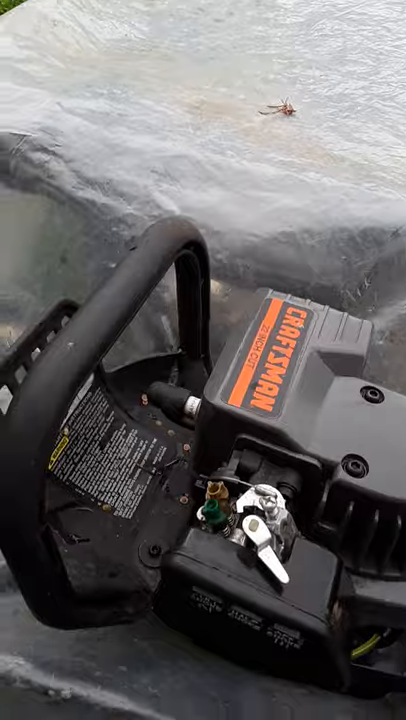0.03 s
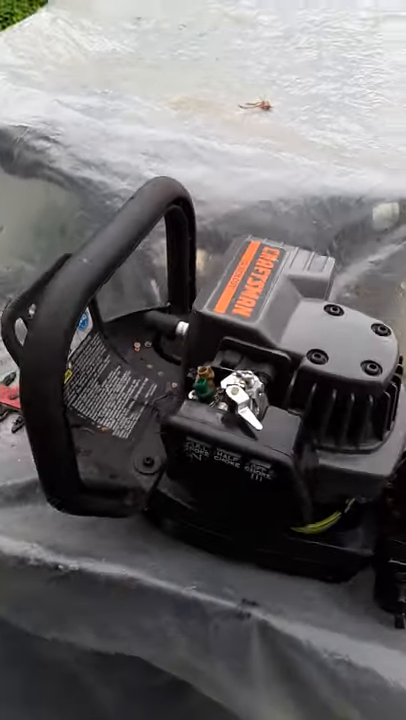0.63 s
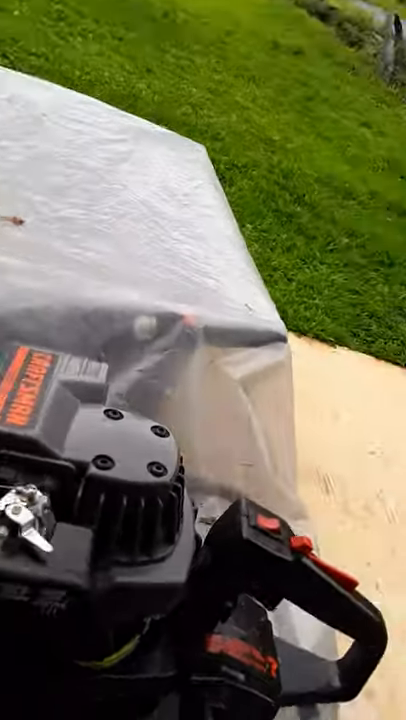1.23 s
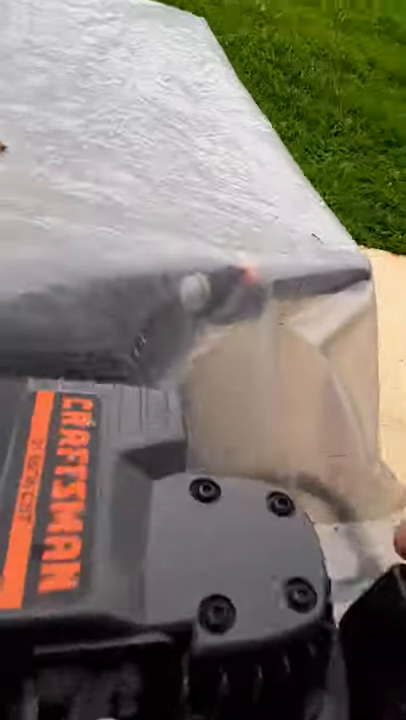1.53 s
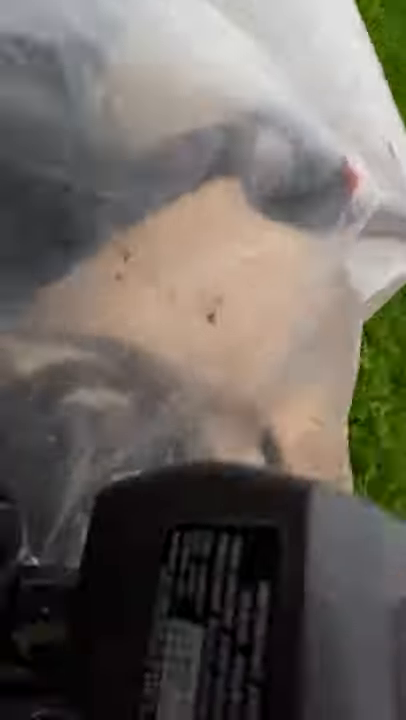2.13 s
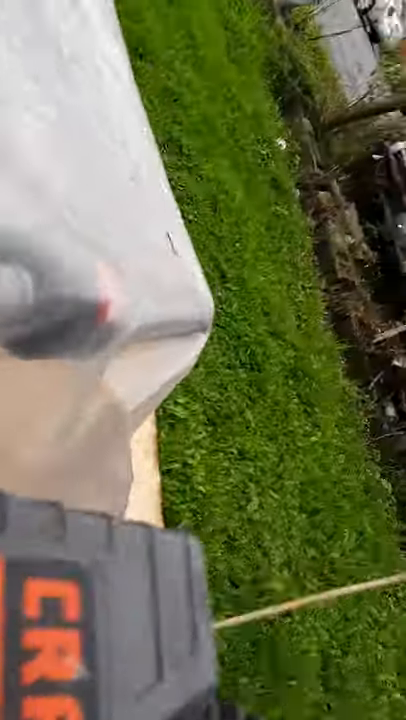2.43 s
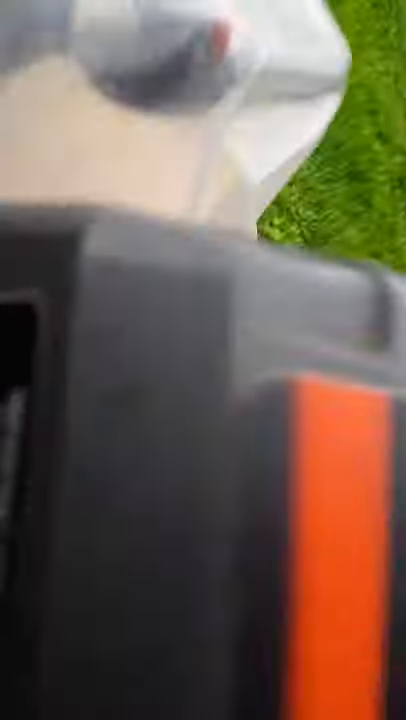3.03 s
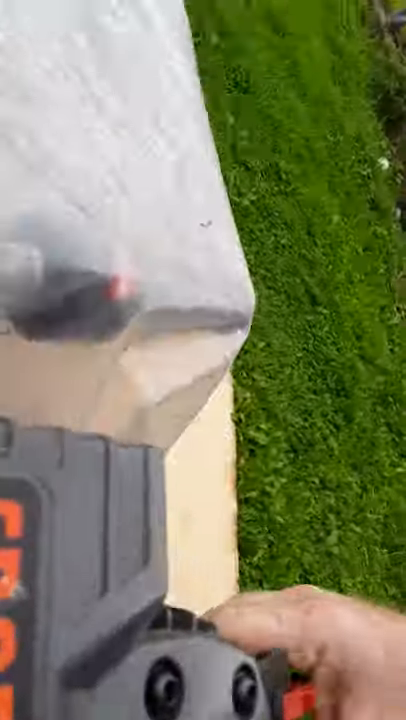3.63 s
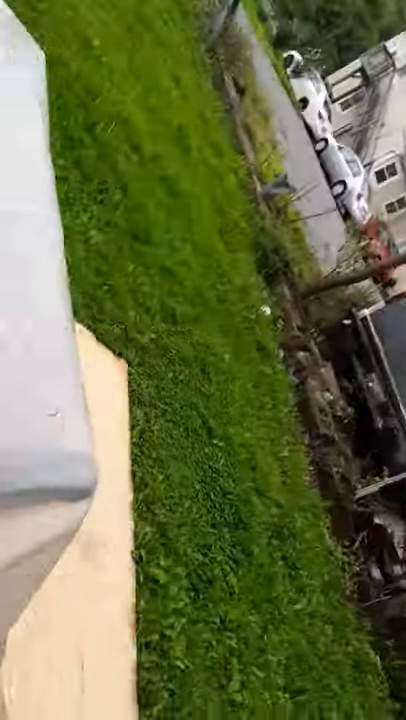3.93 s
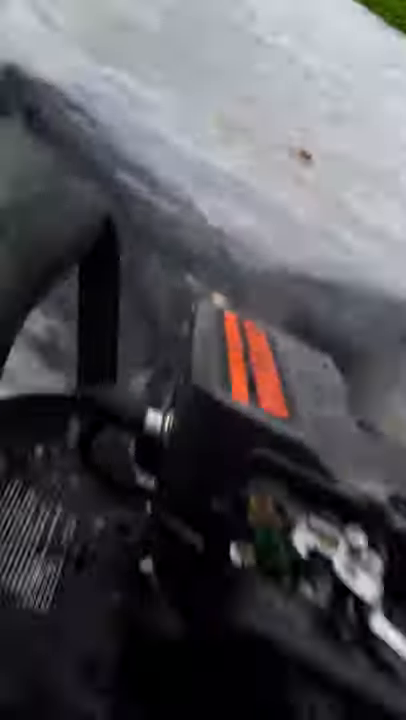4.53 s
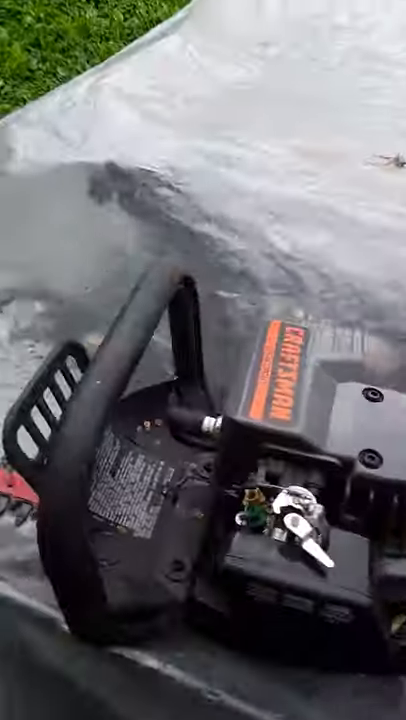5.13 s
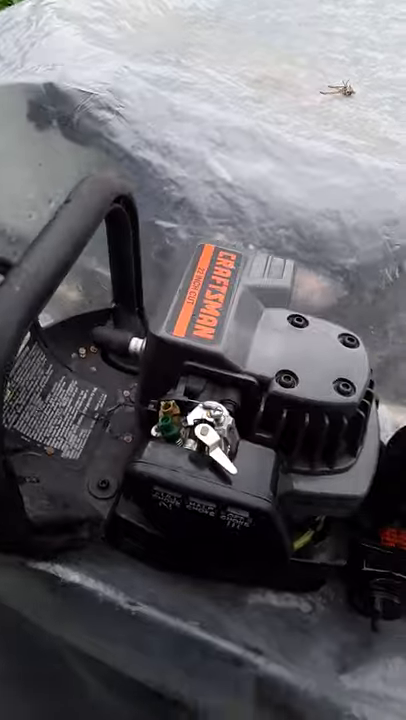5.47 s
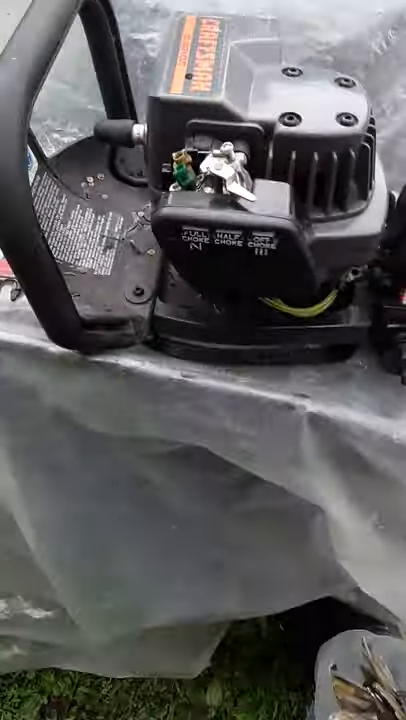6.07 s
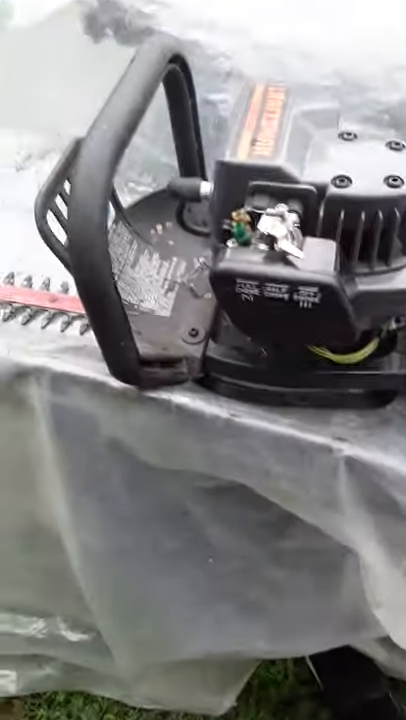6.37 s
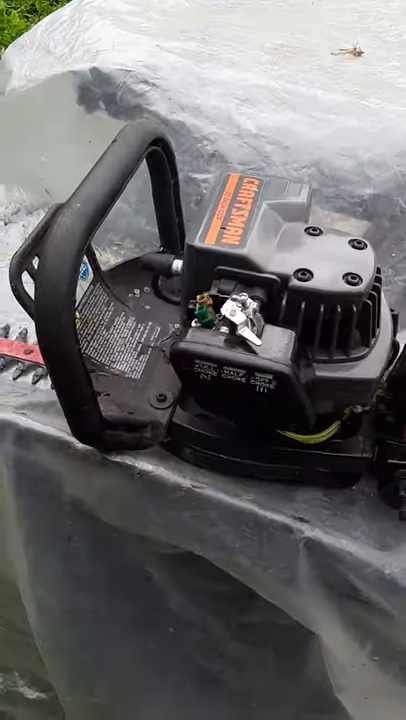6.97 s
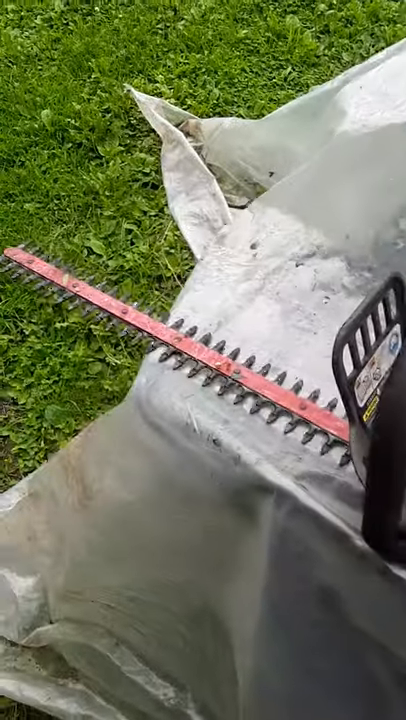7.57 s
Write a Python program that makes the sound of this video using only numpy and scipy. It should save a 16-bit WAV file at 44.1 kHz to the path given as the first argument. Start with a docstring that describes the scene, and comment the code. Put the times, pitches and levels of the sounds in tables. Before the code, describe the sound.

Close up on a quiet lawn with faint insects, a hand knocks against a gasoline hedge trimmer's plastic housing. The first cord pull only chugs and clicks back; the second squeaks and the engine catches. It putters unevenly, dips in level as the microphone turns away, then returns as a buzzing idle with clinking loose metal. One short rev sets the blades rasping before it drops back to idle.

```python
"""A two-stroke hedge trimmer is pull-started on a garden table, climbs to a rattling idle and revs once.
The cord cranks the piston, the starter pawls chatter on the rewind, and a second tug fires the engine.
Each turn puffs through the muffler, slaps the case and shakes loose metal; the rev runs the blades.
The microphone moves from the engine's rear to its front. Behind: insects, open air and a far motor."""
import sys
import numpy as np
from scipy import signal
from scipy.fft import rfft, irfft, next_fast_len
from scipy.io import wavfile
from scipy.ndimage import map_coordinates

SR = 44100
rng = np.random.default_rng(int(sys.argv[2]) if len(sys.argv) > 2 else 0)


def put_to_file(sound):
    """Save the sound as 16-bit audio at rate SR, in the file named by the first command-line argument."""
    columns = np.atleast_2d(sound).T  # one column per channel
    safe = np.clip(columns, -1, 1)
    whole_steps = np.round(safe * 32767)
    wavfile.write(sys.argv[1], SR, whole_steps.astype(np.int16))


N = 343980
TIME = np.arange(N) / SR

# Crank speed. Each row: time in seconds, turns per second.
CRANK_HZ = [(2.84, 20.6), (2.9, 35.8), (3.08, 43.7), (3.34, 53.0), (3.53, 56.0), (3.71, 59.1), (4.01, 61.7),
            (4.12, 65.2), (4.35, 64.0), (4.77, 69.3), (5.26, 66.3), (5.58, 68.0), (6.16, 64.9),
            (6.28, 72.3), (6.41, 64.3), (6.52, 80.4), (6.72, 96.9), (6.91, 83.8), (7.08, 78.6),
            (7.35, 66.7), (7.8, 60.7)]
# Exhaust tones when every turn fires. Each row: multiple of crank speed, level in dB.
EXHAUST_ORDERS = [(1, -49), (3, -25), (4, -31), (5, -29), (7, -29), (8, -31)]

# Spectra. Each row: frequency in Hz, relative density in dB.
MUFFLER_SPECTRUM = [(30, -24), (80, -23), (132, -20), (170, 0), (265, 5.5), (350, 3), (450, -1),
                    (550, -0.5), (750, -12), (1100, -20), (2500, -39)]
GAS_RUSH_SPECTRUM = [(70, -23), (130, -15.5), (220, -1.5), (330, 3), (430, -2), (580, -7), (800, -22),
                     (1200, -22), (3000, -69)]
CASE_REAR_SPECTRUM = [(350, 3.5), (600, -2.5), (953, -8.5), (1270, -4.5), (1400, -10), (1600, -3.5),
                      (1790, -3), (2400, -15), (2760, -19), (3200, -22.5), (4160, -23), (7040, -120)]
CASE_FRONT_SPECTRUM = [(350, -8.5), (600, 2), (920, -3.5), (993, 0), (1190, -3.5), (1290, 3.5),
                       (1440, -5.5), (1570, 3.5), (1740, -6), (1930, 3.5), (2300, -18.5), (2800, -23),
                       (3200, -29.5), (4160, -40), (7040, -120)]
HISS_SPECTRUM = [(1290, -49), (2200, 11.5), (2310, 5.5), (3770, -1.5), (4680, 2.5), (5350, 4), (7900, -5.5),
                 (8870, -17.5), (10100, -12), (11600, -4), (12100, -11), (12600, -5), (13700, -9),
                 (16000, -16)]
BLADE_SPECTRUM = [(590, -18), (1000, 0), (1150, -12), (1480, 5), (1690, -9.5), (1980, 5.5), (2310, -11),
                  (4310, -12), (5310, -26), (6250, -23), (7700, -18), (8260, -29.5), (12400, -12),
                  (16000, -20)]
REEL_SPECTRUM = [(120, -5), (200, -4), (334, -1.5), (387, -8), (601, 1.5), (986, -4.5), (1420, -6),
                 (1650, -0.5), (1870, -9), (3830, -16.5), (4520, -20), (5940, -10.5), (6760, -13.5),
                 (8740, -38), (16000, -32)]
PAWL_SPECTRUM = [(120, -68), (200, -12), (1400, -2), (2050, -1.5), (3370, -5.5), (3760, -5), (4200, -26),
                 (6760, 3.5), (7970, -12), (9580, -21.5), (11500, -15), (16000, -17.5)]
SNAP_SPECTRUM = [(1500, -1.5), (2600, 11), (3200, 7.5), (3900, 6), (6500, 5.5), (8000, -8.5),
                 (15000, -10.5)]
INSECT_SPECTRUM = [(4000, -47), (5900, -16.5), (6400, -7), (6650, -3), (7000, -13), (7600, -25),
                   (9000, -47), (16000, -44)]
AIR_SPECTRUM = [(25, -34), (55, -10), (95, -1.5), (160, -2), (250, -10), (500, -13), (1000, -11.5),
                (1900, -15), (2700, -25.5), (5000, -25.5), (8000, -41)]
RUSTLE_SPECTRUM = [(180, -25), (300, -11), (565, 0.5), (870, -8.5), (1320, 3.5), (2320, -16), (4020, -4.5),
                   (5080, -17), (6620, -13), (7950, -34), (13100, -21), (16000, -42)]

# Resonances. Each row: frequency in Hz, bandwidth in Hz, relative level in dB.
MUFFLER_BARK_MODES = [(595, 80, 4), (745, 100, 2.5), (890, 130, -4)]
MUFFLER_SHELL_MODES = [(535, 90, 0), (720, 200, -12)]
AIRBOX_MODES = [(370, 160, -10.5), (452, 46, 7), (588, 143, 7.5), (707, 86, -4)]
LOOSE_METAL_MODES = [(4360, 86, -2.5), (8690, 44, 4), (11700, 810, -2.5), (12320, 95, 14),
                     (12830, 160, 6.5), (13600, 1200, -8.5)]
TOOTH_MODES = [(3440, 100, 1), (4320, 220, -5), (6060, 300, 11.5), (6460, 600, 6.5)]
CRANKCASE_MODES = [(590, 70, 0), (746, 90, -4), (1720, 120, -3)]
HUB_MODES = [(750, 400, -15), (2120, 210, -8), (3785, 55, -4), (5095, 75, -5), (5900, 60, -13),
             (6640, 80, 2.5), (6998, 25, -2), (7500, 47, -18), (9785, 80, -15)]
HOUSING_MODES = [(1143, 205, 8.5), (1324, 156, 9), (1730, 165, 9.5), (1850, 240, 4)]
THUD_MODES = [(481, 34, 5), (706, 86, 4)]

# Spells of harder rattling. Each row: centre in seconds, length in seconds, boost in dB.
RATTLE_SPELLS = [(4.175, 0.12, 11), (4.77, 0.28, 12), (5.566, 0.46, 8), (6.353, 0.061, 5),
                 (6.527, 0.31, 11.5), (7.2, 0.52, 4)]
# Passing resonances of the running engine.
# Each row: centre in seconds, length in seconds, frequency in Hz, bandwidth in Hz, level in dB.
PASSING_RESONANCES = [(3.066, 0.017, 6550, 550, -22.5), (4.9, 0.029, 1800, 220, -30),
                      (3.22, 0.036, 6300, 370, -25.5), (3.26, 0.033, 6360, 500, -24.5),
                      (3.2, 0.51, 4500, 1100, -40.5), (3.54, 1, 6100, 1100, -39.5),
                      (5.77, 0.58, 535, 60, -30), (6.08, 0.3, 475, 40, -27), (4.78, 0.3, 8700, 100, -40),
                      (5.877, 0.3, 8660, 80, -38), (4.77, 0.13, 4700, 490, -31),
                      (5.02, 0.65, 1354, 140, -30), (4.967, 0.25, 1530, 43, -31.5),
                      (4.96, 0.19, 2590, 110, -36), (5.14, 0.18, 2680, 220, -34.5),
                      (4.8, 0.3, 12500, 300, -45), (5.53, 0.12, 12390, 77, -24),
                      (6.3, 0.23, 12450, 90, -32), (6.31, 0.17, 12800, 870, -33),
                      (6.55, 0.18, 12700, 150, -35), (6.75, 0.9, 1380, 490, -26),
                      (7.248, 0.36, 12100, 500, -40), (7.2, 0.56, 2000, 70, -27),
                      (7.5, 0.52, 1557, 96, -24.5), (7.5, 0.45, 1040, 120, -35.5),
                      (7.4, 0.26, 4400, 160, -42), (7.42, 0.22, 8850, 55, -49)]
# Hardest shakes of the loose metal. Each row: start in seconds, level in dB.
SHAKES = [(3.015, -30), (3.039, -26), (3.132, -38), (3.173, -29), (3.777, -36), (4.149, -27), (5.075, -25),
          (5.122, -23), (5.169, -28), (5.284, -27), (5.33, -25.5), (5.375, -30), (5.4756, -29),
          (5.514, -36), (5.5674, -26), (5.6128, -35), (5.691, -18.5), (5.776, -19.5), (6.624, -21),
          (7.356, -23), (7.415, -24)]
# Taps on a loose steel plate. Each row: start in seconds, level in dB.
PLATE_TAPS = [(4.79, -35), (4.895, -31), (4.935, -31), (5.01, -38), (5.195, -28), (5.45, -39), (5.73, -35),
              (5.87, -32), (6.38, -35), (7.5, -41)]

# Cord running off its reel. Each row: time in seconds, level in dB.
CORD_DB = [(2.01, -28), (2.104, -19.5), (2.33, -16.5), (2.386, -23.5), (2.4, -32), (2.46, -26)]
# Unfired strokes. Each row: port opening in seconds, level in dB, lead of the compression in seconds.
STROKES = [(2.135, -13.5, 0.023), (2.205, -10.5, 0.011), (2.2545, -7.5, 0.021), (2.303, -9, 0.02),
           (2.361, -12.5, 0.022), (2.453, -24, .022), (2.619, -25, 0.01), (2.639, -27, 0.02)]
# Braid on the cord guide. Each row: time in seconds, pitch in Hz, level in dB.
CORD_SQUEAK = [(1.97, 299, -68), (2.01, 338, -36), (2.06, 592, -44), (2.11, 665, -21), (2.14, 698, -70),
               (2.78, 1200, -68), (2.81, 1290, -26), (2.828, 1400, -31), (2.84, 1800, -18),
               (2.865, 1930, -16), (2.885, 2200, -31), (2.915, 2500, -33), (2.945, 2610, -29),
               (2.99, 2700, -60)]
# Housing knocks. Each row: start in seconds, level in dB, thud offset in dB, snap offset in dB.
KNOCKS = [(1.5588, -12.5, -18, -3.5), (1.595, -22, -5, -21), (1.616, -22, -15, -13),
          (1.775, -26.5, -10, 3.5), (1.8328, -26.5, -3.5, -4), (1.91, -31, -20, -17),
          (1.996, -29, -20, -2.5), (2.0743, -21, 3.5, -5.5), (2.4317, -12.5, -9, -9), (2.7635, -12, 4, -5),
          (2.915, -15, -20, 4), (2.953, -21, 5, -6), (2.965, -13.5, 1, -1.5), (3.3679, -1, -30, -13)]

# Insect chorus. Each row: time in seconds, level in dB.
INSECT_DB = [(.2, -50), (.8, -47.5), (1.1, -46.5), (1.5, -49.5), (2.0, -54)]
# Far motor tones. Each row: frequency in Hz, level in dB.
FAR_MOTOR_TONES = [(97, -49), (141.5, -48.5)]

# Microphone turning away from the engine and back. Each row: time in seconds, engine gain in dB.
NEARNESS_DB = [(2.84, -1.5), (3.45, -3.5), (4.05, -9.5), (4.6, -8), (4.9, -3), (5.4, -1), (5.75, 0),
               (6.3, -0.5), (7.3, -0.5), (7.8, -5)]
# Microphone aim. Each row: time in seconds, left minus right in dB.
PAN_DB = [(.2, -2), (1.3, -3), (2.0, -4), (2.7, -6), (2.9, -1.3), (4.06, -4.5), (4.5, -2.5), (7.8, -2)]
# Stereo width. Each row: frequency in Hz, side minus mid in dB.
SIDE_DB = [(60, -22), (110, -17), (200, -19.5), (380, -14), (700, -12.5), (1290, -1), (2380, 2),
           (4400, -0.5), (8120, -1), (15000, 0)]
# Likeness of the two microphone ports. Each row: frequency in Hz, share of direct sound.
DIRECT_SHARE = [(300, 1), (1200, 1), (3000, 0.66), (9000, 0.22)]

CATCH_S, SETTLE_S = 2.836, 0.35  # engine catches; hard early burning decays
REV_S, REV_ATTACK_S, REV_HOLD_S, COAST_S = 6.41, 0.1, 0.14, 0.87
REAR_TO_FRONT_S, REAR_SHADE_DB = (4.51, 4.84), -6  # from behind, intake and loose metal are shaded


def engine():
    """All layers of the running trimmer; the crank sets their beat."""
    turns = crank()
    gas = exhaust(turns) + intake(turns) + gas_rush(turns)
    slap = white() * bog() * beat(turns, lag=-.02, scatter_db=3, t60_s=.035, steady=.9, jitter=.08)
    body = case(slap) + covers(turns) + rattle(turns) + passing_resonances(slap) + shakes(turns)
    return gas + body + blades(turns) + exhaust_tones() + plate()


def crank(burn_every_turns=3, early_share=.14):
    """Start, period and burn quality of each turn. Spent gas lets only every third or so burn well."""
    speed_hz, = curves(CRANK_HZ)
    count = np.cumsum(speed_hz * (TIME > CATCH_S)) / SR
    fire_s = np.interp(np.arange(int(count[-1])) + .15, count, TIME)
    good_turns = np.cumsum(burn_every_turns - (rng.random(size=400) < early_share))
    burn = np.where(np.isin(np.arange(len(fire_s)), good_turns), 1, -.5)
    uneven = np.interp(fire_s, TIME, fade(3.1, 3.6) * (1 - rev(release_s=.4)))  # throttle clears the gas
    return fire_s, 1 / np.interp(fire_s, TIME, speed_hz), burn * uneven


def rev(release_s=COAST_S):
    """One squeeze of the throttle, 0 to 1."""
    let_go_s = REV_S + REV_ATTACK_S + REV_HOLD_S
    return fade(REV_S, REV_S + REV_ATTACK_S) * (1 - fade(let_go_s, let_go_s + release_s))


def bog():
    """Dip in the clatter as the throttle first opens."""
    return amp(-4 * swell(6.418, .036))


def engine_gain(idle_db, rev_db=0, catch_db=0):
    """Layer gain from microphone nearness, with offsets for the rev and the catch."""
    near_db, = curves(NEARNESS_DB)
    catching = np.exp(-np.maximum(TIME - CATCH_S, 0) / SETTLE_S)
    return amp(near_db + idle_db + rev_db * rev() + catch_db * catching)


def beat(turns, lag, scatter_db, t60_s, steady, jitter=.037, burn_db=2.6):
    """One burst per turn over a steady floor, rms 1 while running. Lag and jitter are in turns."""
    fire_s, period_s, burn = turns
    running = TIME > fire_s[0]
    timing, strength = rng.standard_normal((len(fire_s), 2)).T
    sizes = amp(scatter_db * 2 * np.tanh(strength / 2) + burn_db * burn)
    hits = bursts(fire_s + period_s * (lag + jitter * timing), sizes, t60_s, attack_s=.001)
    gate = unit(hits) + steady * running * (.5 + .9 * fade(3.1, 3.9))  # fast firings run together
    return gate / np.sqrt(np.mean(gate[running] ** 2))


def exhaust(turns, thump_db=2.9):
    """Puffs limp through the muffler; open throttle makes it bark, good burns ring its shell."""
    fire_s, period_s, burn = turns
    charge = np.sqrt(period_s * SR)
    timing, strength = rng.standard_normal((len(fire_s), 2)).T
    limp_db = thump_db * (np.roll(burn, 1) - burn) - 1.5 * np.abs(burn)  # firmest after a good burn
    puffs = impulses(fire_s + .0006 + .00017 * timing, charge * amp(limp_db + .9 * strength))
    boom = colour([(70, -20), (115, 0), (160, 0), (260, -14), (900, -50)])
    deep_start = amp(-8.5) * (1 - fade(2.9, 3.3)) * through(puffs, boom)
    muffled = through(puffs, colour(MUFFLER_SPECTRUM))
    putt = engine_gain(-22.3, rev_db=-12, catch_db=-.5) * (muffled + deep_start)

    timing, strength = rng.standard_normal((len(fire_s), 2)).T
    blasts = impulses(fire_s + .0002 * timing, charge * amp(2 * strength))
    roar = white() * beat(turns, lag=0, scatter_db=2, t60_s=.04, steady=.4)
    bark = engine_gain(-19.8) * rev() * through(.9 * blasts + .45 * roar, modes(MUFFLER_BARK_MODES))

    bangs = impulses(fire_s + .0002 * rng.standard_normal(len(fire_s)), charge * np.maximum(burn, 0))
    pop = engine_gain(-25.5) * through(bangs, modes(MUFFLER_SHELL_MODES))
    return putt + bark + pop


def gas_rush(turns):
    """Gas noise pulses through the muffler."""
    flow = white() * beat(turns, lag=0, scatter_db=2, t60_s=.04, steady=.4)
    return engine_gain(-30, rev_db=1.5, catch_db=-3) * through(flow, colour(GAS_RUSH_SPECTRUM))


def exhaust_tones():
    """Under throttle every turn fires and crank harmonics stand out."""
    speed_hz, = curves(CRANK_HZ)
    angle = phase(speed_hz)
    tones = sum(amp(db + 1.8 * wobble(14)) * np.sin(order * angle + .28 * wobble(45))
                for order, db in EXHAUST_ORDERS)
    return np.sqrt(2) * rev(release_s=.77) * tones


def intake(turns):
    """Half a turn after each firing the carburettor gulps air and rings the front-facing airbox."""
    fire_s, period_s, _ = turns
    sizes = np.sqrt(period_s * SR) * amp(rng.standard_normal(len(fire_s)))
    gulps = impulses(fire_s + .5 * period_s, sizes)
    shade_db = REAR_SHADE_DB * (1.5 - front())
    return engine_gain(-24.8 + shade_db) * (1 - rev()) * through(gulps, modes(AIRBOX_MODES))


def case(slap):
    """The slapped case radiates one colour to the rear, another to the front."""
    rear_side = np.sqrt(1 - front()) * through(slap, colour(CASE_REAR_SPECTRUM))
    front_side = np.sqrt(front()) * through(slap, colour(CASE_FRONT_SPECTRUM))
    return engine_gain(-22.5, catch_db=8) * (rear_side + front_side)


def covers(turns):
    """Covers chatter at each firing and bounce again at any point of the turn."""
    chatter = beat(turns, lag=0, scatter_db=5, t60_s=.045, steady=.8, jitter=.1)
    bounce = beat(turns, lag=.45, scatter_db=5, t60_s=.04, steady=.2, jitter=.28)
    contact = white() * bog() * (.7 * chatter + .42 * bounce)
    return engine_gain(-32, rev_db=1.5, catch_db=4.5) * through(contact, colour(HISS_SPECTRUM))


def rattle(turns, full_speed_hz=66.4, falloff_db_per_hz=3.5):
    """Loose metal jiggles each turn, harder in spells, and dies away at low crank speed."""
    speed_hz, = curves(CRANK_HZ)
    jiggle = bog() * beat(turns, lag=.15, scatter_db=8, t60_s=.025, steady=.12, jitter=.2)
    spell_db = sum(db * swell(centre_s, length_s) for centre_s, length_s, db in RATTLE_SPELLS)
    slow_db = falloff_db_per_hz * np.minimum(speed_hz - full_speed_hz, 0)
    shade_db = REAR_SHADE_DB * (1 - front())
    gain = engine_gain(-33.5, rev_db=-6, catch_db=2) * amp(spell_db + slow_db + shade_db)
    return gain * through(white() * jiggle, modes(LOOSE_METAL_MODES))


def passing_resonances(pulsing):
    """Engine resonances come and go: throaty low swells, shifting midrange, thin metallic buzzes; just after
    the catch, brief ticks of the starter pawls."""
    flutter = pulsing * unit(amp(3.5 * wobble(45)))
    return sum(amp(db) * swell(centre_s, length_s) * through(flutter, modes([(hz, width_hz, 0)]))
               for centre_s, length_s, hz, width_hz, db in PASSING_RESONANCES)


def shakes(turns):
    """Single hard shakes and each good burn jolt the loose parts."""
    fire_s, _, burn = turns
    start_s, db = np.transpose(SHAKES)
    burn_jolts = engine_gain(-33) * bursts(fire_s, np.maximum(burn, 0), t60_s=.08)
    jolts = white() * (bursts(start_s, amp(db), t60_s=.076) + burn_jolts)
    clink = amp(REAR_SHADE_DB * (1.5 - front())) * through(jolts, modes(LOOSE_METAL_MODES))
    return clink + amp(-3) * through(jolts, colour(HISS_SPECTRUM))


def plate(pitch_hz=5297):
    """A loose steel plate rings one clear note at each tap."""
    start_s, db = np.transpose(PLATE_TAPS)
    note = np.sin(2 * np.pi * pitch_hz * TIME + .4 * wobble(120))
    return bursts(start_s, amp(db), t60_s=.3, attack_s=.004) * amp(2 * wobble(70)) * note


def blades(turns):
    """With the clutch in, the blades clack and their teeth rasp at both ends of travel."""
    ends = (.25, .75)
    clacks = sum(beat(turns, lag, scatter_db=3, t60_s=.018, steady=.35, jitter=.06) for lag in ends)
    scrape = amp(-25) * through(white() * clacks, colour(BLADE_SPECTRUM))
    snags = sum(beat(turns, lag, scatter_db=4, t60_s=.03, steady=.45, jitter=.1) for lag in ends)
    rasp = amp(-31) * through(white() * snags, modes(TOOTH_MODES))
    return rev() * (scrape + rasp)


def cranking():
    """The cord whirrs off its reel; each unfired stroke hisses, kicks the crankcase, then puffs."""
    cord_db, = curves(CORD_DB)
    port_s, db, lead_s = np.transpose(STROKES)
    compression = bursts(port_s - lead_s, amp(db - db.max()), t60_s=.097)
    grain = amp(2 * wobble(220))
    pulling = fade(2.022, 2.137) * (1 - fade(2.45, 2.47))
    friction = white() * (.68 + 1.52 * compression) * grain
    whirr = amp(cord_db) * pulling * through(friction, colour(REEL_SPECTRUM))
    kicks = white() * bursts(port_s - lead_s, amp(db - 7), t60_s=.023)
    clunk = amp(4) * through(kicks, modes(CRANKCASE_MODES))
    snap = amp(-11) * through(kicks, colour(SNAP_SPECTRUM))
    puff = colour([(30, -32), (80, -5), (140, 4.5), (230, .5), (400, -6.5), (900, -46), (3000, -56)])
    chug = through(impulses(port_s, amp(db + 1.5)), puff / np.abs(puff).max())
    return whirr + clunk + snap + chug


def pawls(release_s=2.3938, rewind_s=2.4625, end_s=2.704, rate_hz=84):
    """The pawls let go, then skip over the steel hub on the rewind; its clearest mode rings on."""
    timing, strength = rng.standard_normal((40, 2)).T
    strike_s = rewind_s + np.arange(len(timing)) / rate_hz + .00093 * timing
    sizes = amp(-9 + strength) * (strike_s < end_s)
    hits = bursts(np.append(strike_s, release_s), np.append(sizes, amp(-7.5)), t60_s=.06, attack_s=.0004)
    stick_slip = amp(4 * wobble(1100))
    skid = amp(-8.5) * white() * stick_slip * hits
    undamped = fade(rewind_s, rewind_s + .1) * (1 - fade(2.765, 2.785))  # the next tug stops the ring
    ring = amp(-10) * undamped * through(skid, modes([(7098, 10, 0)]))
    hub = amp(2.4) * through(skid, modes(HUB_MODES))
    scrape = amp(-2.6) * through(skid, colour(PAWL_SPECTRUM))
    return hub + scrape + ring


def tugs():
    """The braid squeaks higher as each pull speeds up; the reel whirrs briefly on the second."""
    pitch_hz, db = curves(CORD_SQUEAK)
    tone = np.sin(phase(pitch_hz * (1 + .11 * wobble(1500))))
    squeak = amp(db + 3.5 * wobble(400)) * tone * (1 - fade(2.99, 3.02))
    whirr = through(white(), colour(REEL_SPECTRUM)) + amp(-11.5) * through(white(), colour(HISS_SPECTRUM))
    return squeak + amp(-26) * swell(2.937, .28) * whirr


def knocks():
    """Hand and starter grip hit the plastic housing: hollow ring, thud and snap."""
    start_s, db, thud_db, snap_db = np.transpose(KNOCKS)
    ring = through(white() * bursts(start_s, amp(db), t60_s=.039), modes(HOUSING_MODES))
    snap = through(white() * bursts(start_s, amp(db + snap_db), t60_s=.032), colour(SNAP_SPECTRUM))
    body = modes(THUD_MODES)
    thud = through(impulses(start_s, amp(db + thud_db)), body / np.abs(body).max())
    return amp(-3.5) * ring + amp(1.5) * thud + amp(-2.5) * snap


def garden():
    """Open air, far motor, insects and a rustle of movement; all drop back during the first pull."""
    insect_db, = curves(INSECT_DB)
    lawn_db = 6.5 * fade(.84, 1.56)  # microphone swings towards the lawn
    air = amp(-48 + lawn_db) * through(white(), colour(AIR_SPECTRUM))
    motor = sum(amp(db + 2.2 * wobble(15)) * np.sqrt(2) * np.sin(phase(hz * (1 + .007 * wobble(8))))
                for hz, db in FAR_MOTOR_TONES)
    insects = amp(insect_db + wobble(24)) * through(white(), colour(INSECT_SPECTRUM))
    rustle = amp(-45 + 1.2 * wobble(27.62)) * swell(1.35, .78) * through(white(), colour(RUSTLE_SPECTRUM))
    return (air + motor + insects + rustle) * amp(-15 * fade(2.1, 2.6))


def front():
    """Microphone position: 0 behind the engine, 1 in front."""
    return fade(*REAR_TO_FRONT_S)


def microphone(pair, left_lead_s):
    """Two ports: direct sound differs in phase between them, scattered sound adds width."""
    size = next_fast_len(N + SR // 4)
    hz = np.fft.rfftfreq(size, 1 / SR)
    direct, scattered = rfft(pair, size)[[0, -1]]
    share = np.clip(along(DIRECT_SHARE, hz), 0, 1) * np.sin(2 * np.pi * hz * left_lead_s)
    side = amp(along(SIDE_DB, hz)) * (1j * share * direct + np.sqrt(1 - share ** 2) * scattered)
    return irfft(np.array([direct + side, direct - side]), size)[:, :N]


def amp(db):
    """Decibels to gain."""
    return 10 ** (np.asarray(db) / 20)


def unit(x):
    """Scale to rms 1."""
    return x / np.sqrt(np.mean(x ** 2) + 1e-20)


def phase(hz):
    """Running phase in radians."""
    return 2 * np.pi * np.cumsum(hz) / SR


def along(points, hz):
    """Interpolate (Hz, value) points on a log axis."""
    point_hz, values = np.transpose(points)
    return np.interp(np.log(hz + 1), np.log(point_hz + 1), values)


def curves(rows):
    """One value per sample for each column after the time."""
    time_s, *columns = np.transpose(rows)
    return [np.interp(TIME, time_s, column) for column in columns]


def fade(start_s, end_s):
    """Ramp from 0 to 1."""
    return np.clip((TIME - start_s) / max(end_s - start_s, .001), 0, 1)


def swell(centre_s, length_s):
    """Smooth hump of height 1."""
    return np.exp(-(2 * (TIME - centre_s) / length_s) ** 2)


def wobble(rate_hz):
    """Smooth random curve."""
    return map_coordinates(rng.standard_normal(int(N * rate_hz / SR) + 4), [TIME * rate_hz])


def white():
    """Two unrelated noises."""
    return rng.standard_normal((2, N))


def colour(points, size=4096):
    """Minimum-phase response of energy 1 from a spectrum, rolling off below its first point."""
    hz = np.fft.rfftfreq(size, 1 / SR)
    db = along(points, hz) - 18 * np.log2(np.maximum(points[0][0] / (hz + 1), 1))
    cepstrum = irfft(np.log(amp(np.maximum(db, -90))))
    cepstrum[1:size // 2] *= 2
    cepstrum[size // 2 + 1:] = 0
    response = irfft(np.exp(rfft(cepstrum)))
    return response / np.linalg.norm(response)


def modes(rows, size=16384):
    """Response of energy 1 from damped resonances."""
    t = TIME[:size]
    response = sum((-1) ** k * amp(db) * width * np.exp(-np.pi * width * t) * np.cos(2 * np.pi * hz * t)
                   for k, (hz, width, db) in enumerate(rows))
    return response / np.linalg.norm(response)


def through(x, response):
    """Convolve each channel."""
    return signal.fftconvolve(np.atleast_2d(x), response[None], axes=1)[:, :N]


def impulses(times_s, sizes):
    """One spike per event."""
    return np.bincount(np.clip(np.round(times_s * SR).astype(int), 0, N), sizes, N + 1)[:N]


def bursts(times_s, sizes, t60_s, attack_s=.00005, size=8192):
    """Envelope that rises at each event and decays."""
    t = TIME[:size] + 1 / SR
    return through(impulses(times_s, sizes), amp(-60 * t / t60_s) * (1 - np.exp(-t / attack_s)))[0]


def scene():
    """Engine, starter and garden, panned with the microphone's aim."""
    pan_db, = curves(PAN_DB)
    trimmer = engine()
    from_rear = (1 - front()) * microphone(trimmer, left_lead_s=-.00046)
    from_front = front() * microphone(trimmer, left_lead_s=.0002)
    starter = microphone(cranking() + pawls() + tugs() + knocks(), left_lead_s=-.000453)
    background = microphone(garden(), left_lead_s=-.000062)
    return (from_rear + from_front + starter + background) * amp(np.array([pan_db, -pan_db]) / 2)


def record(dry):
    """Fade in after a moment, round off peaks, cut above 16 kHz."""
    opened = dry * fade(.15, .19)
    limited = opened / (1 + np.abs(opened) ** 6) ** (1 / 6)
    return irfft(rfft(limited) * (np.fft.rfftfreq(N, 1 / SR) < 16000), N)


dry = scene()
out = record(dry)
put_to_file(out)
```